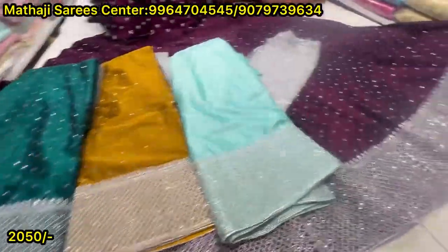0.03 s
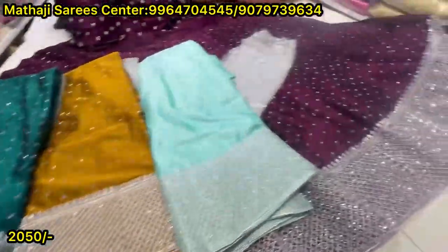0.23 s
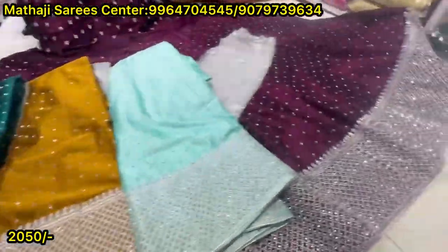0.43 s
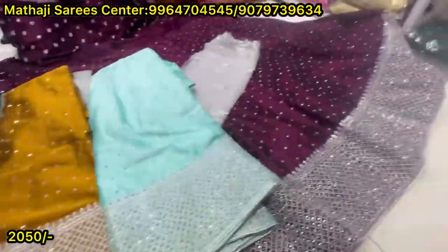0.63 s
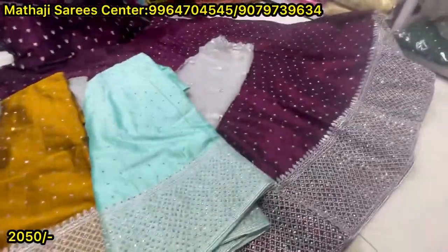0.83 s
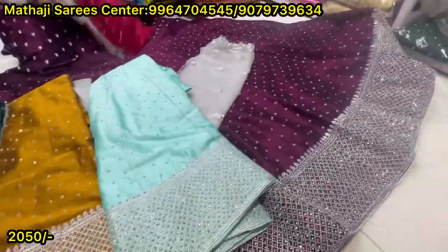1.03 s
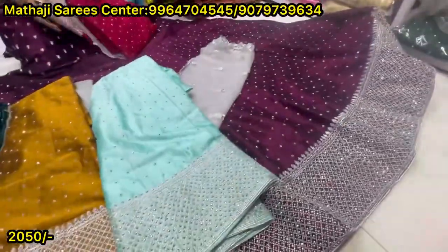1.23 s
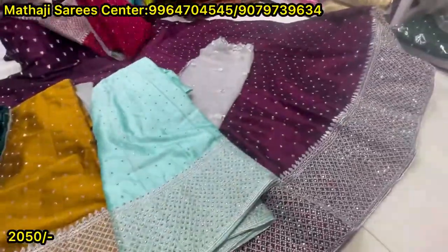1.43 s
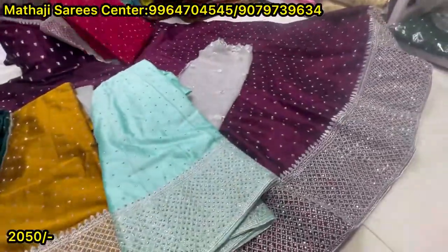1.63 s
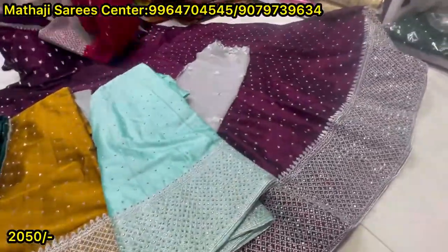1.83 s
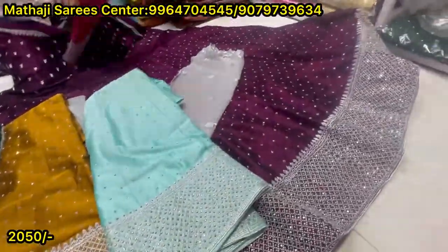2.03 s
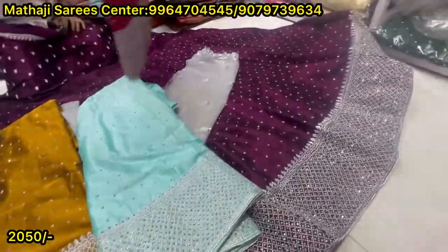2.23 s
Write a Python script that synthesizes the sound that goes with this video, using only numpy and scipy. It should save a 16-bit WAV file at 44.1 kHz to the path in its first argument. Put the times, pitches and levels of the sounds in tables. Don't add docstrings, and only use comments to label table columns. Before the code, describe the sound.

Close, crisp fabric rustling comes in quick uneven bursts, peaking near half a second and one second, softening midway, then picking up again; low motor hum and soft air hiss sit far beneath in a dry room.

```python
import sys
import numpy as np
from scipy import signal
from scipy.fft import rfft, irfft
from scipy.io import wavfile

SR = 44100
rng = np.random.default_rng(int(sys.argv[2]) if len(sys.argv) > 2 else 0)


def gain_from_db(level_db):
    decades = np.asarray(level_db, float) / 20
    return 10 ** decades


def bounce(signal):
    frames = np.transpose(np.atleast_2d(signal))
    limited = np.clip(frames, -1, 1)
    pcm = np.round(limited * 32767).astype(np.int16)
    wavfile.write(sys.argv[1], SR, pcm)


N = 101209

# f/Hz, density level/dB
CLOTH_SPECTRUM = [(90, -29.5), (150, -11), (420, -8), (900, -8), (1700, -5), (5000, -2), (9000, -0.5),
                  (16000, -17.5)]


def rms_one(x):
    return x / np.sqrt(np.mean(x ** 2) + 1e-20)


def at_hz(points, hz):
    f, level = np.transpose(points)
    return np.interp(np.log(hz), np.log(f), level)


def drift(rate):
    r = np.exp(-20 * np.pi * rate / SR)
    white = rng.standard_normal(N // 10 + 4002)
    slow = signal.lfilter([1], [1, -2 * r, r * r], white)[4000:]
    return np.interp(np.arange(N) / 10, np.arange(len(slow)), rms_one(slow))


def ring(clicks, hz, t60):
    r = gain_from_db(-60 / (t60 * SR))
    w = 2 * np.pi * hz / SR
    return signal.lfilter([0, np.sin(w)], [1, -2 * r * np.cos(w), r * r], clicks + 1e-18)


def narrow(hz, width_hz):
    white = rng.standard_normal(N + SR)
    t60 = np.log(1000) / np.pi / width_hz
    once = ring(white, hz, t60)
    return rms_one(ring(once, hz, t60)[SR:])


def coloured(x, spectrum):
    size = 16384
    hz = np.maximum(np.fft.rfftfreq(size, 1 / SR), 1)
    cepstrum = irfft(np.log(gain_from_db(at_hz(spectrum, hz))), size)
    cepstrum[1:size // 2] *= 2
    cepstrum[size // 2 + 1:] = 0
    h = irfft(np.exp(rfft(cepstrum)), size)
    return signal.fftconvolve(x, h / np.sqrt(np.sum(h ** 2)))[:N]


def room_air():
    # f/Hz, density level/dB
    air_spectrum = [(70, -20), (122, 6), (200, -3), (330, -8), (500, -4), (1400, -6), (8000, -15),
                    (16000, -30)]
    return gain_from_db(-62) * coloured(rng.standard_normal(N), air_spectrum)


def fan():
    # t/s, f/Hz, level/dB
    drone_path = [(0.0, 59.6, -63), (0.11, 65.4, -65), (0.42, 59.5, -60), (0.61, 59.9, -64),
                  (0.78, 64.2, -67), (0.89, 56.3, -65.5), (1.49, 58.35, -52.5), (1.64, 59, -50.5),
                  (1.75, 62.7, -62), (1.98, 62.4, -49.5), (2.12, 66.7, -67), (2.18, 65.1, -52),
                  (2.2, 67.1, -81), (2.29, 70.4, -49.5)]
    s, hz, db = np.transpose(drone_path)
    t = np.arange(N) / SR
    phase = 2 * np.pi * np.cumsum(np.interp(t, s, hz)) / SR
    drone = gain_from_db(np.interp(t, s, db)) * np.sqrt(2) * np.sin(phase)
    return drone + gain_from_db(-63) * narrow(70.8, 44)


def motors():
    # f/Hz, level/dB
    motor_tones = [(99.7, -61), (92.1, -66)]
    lull_s = 1.64
    t = np.arange(N) / SR
    hum = 0
    for k, (hz, db) in enumerate(motor_tones):
        hum = hum + (-1) ** k * gain_from_db(db) * np.sqrt(2) * np.sin(2 * np.pi * hz * (t - lull_s))
    return hum


def whistle():
    end_s, fade_s, gap_s, gap_width_s = .33, .04, .065, .035
    t = np.arange(N) / SR
    fade = np.exp(-np.maximum(t - end_s, 0) / fade_s)
    gap = 1 - np.exp(-((t - gap_s) / gap_width_s) ** 2)
    return gain_from_db(-60.5) * fade * gap * narrow(3255, 60)


def effort(octaves):
    # start t/s, length/s, level/dB, tilt/(dB per octave)
    crumples = [(-.01, 0.02, -52.5, -4), (.0135, 0.036, -43.5, -3.5), (.105, 0.1, -43.5, -1.5),
                (.148, 0.12, -59, -9), (.173, 0.0034, -39.5, -4), (.312, 0.026, -45.5, -1.5),
                (.4675, .026, -32.5, -.1), (0.498, 0.024, -31, -0.6), (.522, 0.045, -39, -1.5),
                (.579, 0.082, -38, -0.5), (.63, 0.049, -43, -1), (.674, 0.076, -41, -2.2),
                (.808, 0.055, -52, -6), (.924, .035, -46.5, -3), (1.058, 0.048, -25, -0.13),
                (1.108, 0.015, -32.5, 1), (0.955, 0.053, -51.5, -6), (1.141, 0.058, -42, -3),
                (1.422, 0.061, -43, -2.5), (1.487, .052, -45.5, -3.5), (1.543, 0.029, -51, -4),
                (1.574, 0.036, -41, -3), (1.717, 0.073, -43, -2.8), (1.789, 0.1, -36.5, -1.3),
                (1.86, 0.046, -35, -1), (2.03, 0.035, -39, -1), (2.117, 0.064, -46.5, -4.7),
                (2.222, 0.065, -55.5, -5.5)]
    # start t/s, length/s, level/dB, tilt/(dB per octave)
    slides = [(.04, 0.063, -49, -3), (.17, 0.13, -49, -2.5), (.24, 0.077, -42, -2.5),
              (.31, 0.09, -53, -3.5), (.7, 0.14, -43.5, -1.1), (.98, 0.077, -44.5, -2.3),
              (1.025, 0.053, -38, -1.5), (.87, 0.056, -48.5, -3), (1.12, .03, -47, -3.5),
              (1.18, 0.099, -41.5, -2.1), (.38, 0.096, -57.5, -4.5), (1.22, 0.11, -40, -2),
              (1.29, 0.14, -45.5, -3), (1.59, 0.082, -35, -1.6), (1.665, 0.045, -50.5, -6),
              (1.89, 0.085, -35.5, -1), (1.96, 0.061, -39.5, -0.5), (2.05, 0.057, -42.5, -2),
              (.835, 0.037, -51, -3), (2.16, .03, -57, -5)]
    attack_s, release_s, swell_share, sag_db_per_s = .002, .006, 0.44, 65.5
    t = np.arange(0, N + 32, 32) / SR
    power = gain_from_db(2 * -65)
    for rows, sudden in ((crumples, True), (slides, False)):
        for s, length, db, tilt_db in rows:
            rise_s = attack_s if sudden else swell_share * length
            rise = np.clip((t - s) / rise_s, 0, 1) ** 2
            sag = gain_from_db(-sag_db_per_s * np.maximum(t - s - rise_s, 0))
            release = np.exp(-np.maximum(t - s - length, 0) / release_s)
            level = gain_from_db(db + tilt_db * max(octaves, -2))
            power = power + (rise * sag * release * level) ** 2
    return np.interp(np.arange(N) / SR, t, np.sqrt(power))


def rustle():
    grains_per_s, spread_db, biggest, grain_cycles, full_grain_hz = 3300, 7, 2.4, 3.14, 1450
    clump_db, flicker_db, grain_db, hiss_db = 4.0, 1, -5.5, -6.5
    clump = drift(130)
    sizes = gain_from_db(spread_db * np.minimum(rng.exponential(1, N), biggest)) * rng.choice([-1, 1], N)
    denser = (effort(0) / gain_from_db(-43)) ** 0.46
    chance = grains_per_s * denser * gain_from_db(clump_db * clump) / SR
    born = (rng.random(N) < chance) / np.sqrt(denser)
    edges = np.geomspace(150, 17000, 15)
    own_band = rng.integers(0, 14, N)
    white = rng.standard_normal((2, N))
    out = 0
    for k, (low, high) in enumerate(zip(edges, edges[1:])):
        hz = np.sqrt(low * high)
        sos = signal.butter(2, [low, high], "band", fs=SR, output="sos")
        near = born * (abs(own_band - k) < 3) * sizes * rng.uniform(.2, 1, N)
        ringing = ring(near * (own_band == k), hz, grain_cycles / hz)
        grains = rms_one(signal.sosfilt(sos, near + ringing))
        flicker = gain_from_db(flicker_db * (clump + drift(27)))
        hiss = rms_one(signal.sosfilt(sos, white[k % 2])) * flicker
        band = gain_from_db(grain_db) * min(hz / full_grain_hz, 1) * grains + gain_from_db(hiss_db) * hiss
        out = out + np.sqrt(high - low) * band * effort(np.log2(hz / 5000))
    return coloured(out / np.sqrt(edges[-1]), CLOTH_SPECTRUM)


def snaps():
    # t/s, peak level/dB, ring f/Hz, after-crackle level/dB relative to the peak
    first_snaps = [(0.1562, -15, 8300, -22), (0.1793, -23, 6600, -9), (0.2799, -23, 7600, -12),
                   (0.2879, -26, 7900, -15), (0.3183, -27, 8200, -9), (0.3682, -32, 6800, -16),
                   (0.3874, -33, 8900, -10), (0.5151, -18, 10200, -26), (0.5373, -24, 9100, -26),
                   (0.5649, -15, 9200, -20), (0.6892, -22, 7300, -26), (0.7074, -24, 9000, -21),
                   (0.8097, -18, 4400, -18), (0.8122, -24, 4900, -14), (0.8314, -22, 6500, -20),
                   (0.8349, -28, 8500, -26), (0.9132, -30, 9100, -16), (0.967, -26, 5600, -16),
                   (0.9776, -28, 9600, -13), (1.0541, -20, 6800, -12), (1.1089, -19, 7100, -26),
                   (1.1176, -17, 9000, -26), (1.1245, -23, 8200, -26), (1.1677, -26, 5700, -15),
                   (1.2426, -23, 9600, -12), (1.2533, -24, 7100, -8), (1.331, -29, 3100, -14),
                   (1.3661, -29, 4200, -8), (1.3822, -31, 6300, -12), (1.4243, -26, 2600, -10),
                   (1.4505, -27, 4500, -8), (1.4686, -25, 7600, -18), (1.4893, -25, 8100, -12),
                   (1.516, -25, 5100, -12), (1.5605, -26, 7500, -20), (1.6112, -22, 9000, -18),
                   (1.6252, -21, 9400, -18), (1.6916, -28, 8500, -9), (1.7199, -24, 8200, -17),
                   (1.7293, -26, 9400, -15), (1.7585, -30, 6900, -26), (1.7761, -27, 8300, -8),
                   (1.7912, -26, 6500, -8), (1.7933, -20, 5500, -18), (1.8631, -18, 7200, -8),
                   (1.9254, -25, 8100, -14), (1.953, -20, 9900, -26), (1.9642, -24, 7100, -26),
                   (2.0104, -27, 8500, -26), (2.0316, -25, 7100, -15), (2.1087, -29, 4000, -17),
                   (2.1195, -27, 8100, -8), (2.1245, -27, 6700, -8), (2.1274, -22, 7900, -15),
                   (2.1378, -23, 9600, -12), (2.166, -32, 8400, -22), (2.2077, -35, 4800, -15),
                   (2.2246, -35, 6400, -9), (2.2456, -23, 9600, -12), (2.2714, -17, 9500, -17)]
    # t/s, peak level/dB, ring f/Hz
    further_snaps = [(0.0902, -39, 9000), (0.1327, -31, 6200), (0.2624, -32, 9700), (0.3171, -27, 8100),
                     (0.4775, -21, 6700), (0.5797, -29, 7500), (0.636, -28, 7400), (0.6749, -29, 9700),
                     (0.6815, -29, 4900), (0.738, -28, 9900), (0.778, -31, 9300), (0.8165, -31, 9500),
                     (0.8301, -28, 9500), (0.9253, -32, 6100), (1.004, -31, 6700), (1.0464, -26, 5900),
                     (1.064, -19, 9600), (1.0775, -15, 8100), (1.1039, -17, 6200), (1.1519, -26, 5500),
                     (1.1556, -29, 8400), (1.1822, -30, 5600), (1.2069, -30, 5100), (1.2614, -26, 7700),
                     (1.2693, -24, 8600), (1.2732, -25, 8500), (1.304, -30, 6300), (1.3146, -30, 8500),
                     (1.3375, -31, 8800), (1.3522, -30, 5500), (1.4314, -30, 10200), (1.507, -30, 6600),
                     (1.5236, -37, 2300), (1.5302, -33, 3700), (1.5554, -38, 3600), (1.5842, -29, 2700),
                     (1.6005, -28, 4000), (1.7472, -29, 7600), (1.7692, -30, 6500), (1.7793, -29, 8300),
                     (1.8039, -25, 6500), (1.8203, -28, 6100), (1.8423, -27, 8400), (1.8823, -26, 4000),
                     (1.8948, -24, 4900), (1.9016, -28, 8100), (1.9135, -28, 7800), (1.9285, -24, 4400),
                     (1.947, -22, 7900), (2.0013, -28, 7400), (2.0042, -27, 8000), (2.0433, -28, 9200),
                     (2.0898, -28, 6400), (2.0962, -30, 9500), (2.1466, -27, 8600), (2.1511, -28, 4900),
                     (2.1564, -31, 6800), (2.1772, -35, 7300), (2.2365, -36, 4800), (2.2555, -33, 6200)]
    creases = first_snaps + [(*tick, -13) for tick in further_snaps]
    lag_s, rise_s, ring_t60_s, after_t60_s, lead_t60_s = -.0002, .0002, .0016, .017, .009
    ring_db, click_db, lead_db = -3.5, -2.5, -4
    rings, broad = np.zeros(N + SR), np.zeros(N + SR)
    t = np.arange(2048) / SR
    rise = 1 - np.exp(-t / rise_s)
    shape = rise * gain_from_db(-60 * t / ring_t60_s)
    for s, db, hz, after_db in creases:
        i = int((s + lag_s) * SR)
        noise = rng.standard_normal((2, len(t)))
        rings[i:i + len(t)] += gain_from_db(db + ring_db) * shape / shape.max() * np.sin(2 * np.pi * hz * t)
        broad[i + int(rise_s * SR)] += gain_from_db(db + click_db) * np.sign(noise[0, 0])
        crackle = noise[0] * abs(noise[1])
        broad[i:i + len(t)] += rise * gain_from_db(db + after_db - 60 * t / after_t60_s) * crackle
        creak = gain_from_db(db + after_db + lead_db - 60 * t[256:0:-1] / lead_t60_s)
        broad[i - 256:i] += creak * noise[1, -256:]
    thin = signal.butter(2, 2100, "high", fs=SR, output="sos")
    return signal.sosfilt(thin, rings[:N] + coloured(broad[:N], CLOTH_SPECTRUM))


def flops():
    # t/s, length/s, level/dB, f/Hz
    puffs = [
        (1.05, 0.069, -46.5, 527),
        (1.045, 0.045, -49, 165),
        (0.15, 0.072, -59, 180),
    ]
    t = np.arange(N) / SR
    out = 0
    for s, length, db, hz in puffs:
        swell = np.sin(np.pi * np.clip((t - s) / length, 0, 1))
        out = out + gain_from_db(db) * swell * narrow(hz, hz * 0.44)
    return out


def shop(x):
    t = np.arange(SR // 4) / SR
    tail = rng.standard_normal(len(t)) * gain_from_db(-60 * t / .1) * (t > .003)
    return signal.fftconvolve(x, tail / np.sqrt(np.sum(tail ** 2)))[:N]


def scene():
    background = room_air() + fan() + motors() + whistle()
    cloth = rustle() + snaps() + flops()
    return (cloth + gain_from_db(-16) * shop(cloth) + background)[None]


def roll_off(x):
    return signal.sosfilt(signal.butter(12, 16630, fs=SR, output="sos"), x)


def record(dry):
    # f/Hz, level/dB
    mic_response = [(38, -26), (46, -1.5), (9900, -0.5), (11800, -7.5), (15500, -2.5)]
    headroom = .27
    x = headroom * np.tanh(coloured(dry[0], mic_response) / headroom)
    low_pass = signal.ellip(8, .3, 31, 15750, fs=SR, output="sos")
    mix = signal.sosfilt(low_pass, x)[None]
    return roll_off(mix)


dry = scene()
out = record(dry)
bounce(out)
```